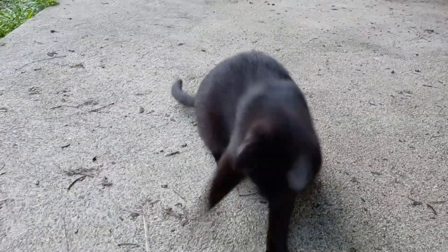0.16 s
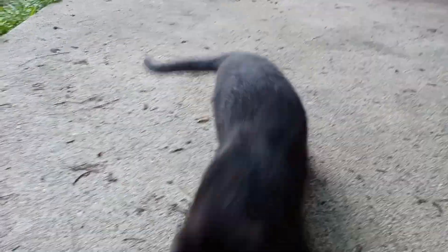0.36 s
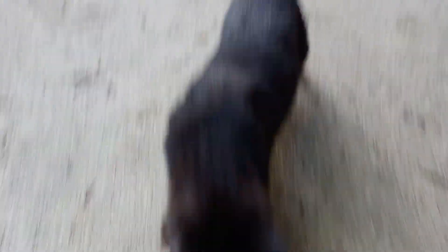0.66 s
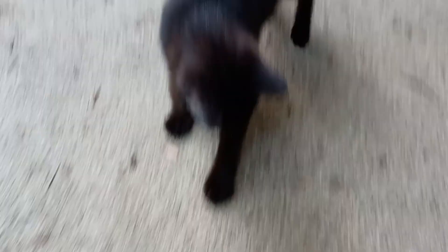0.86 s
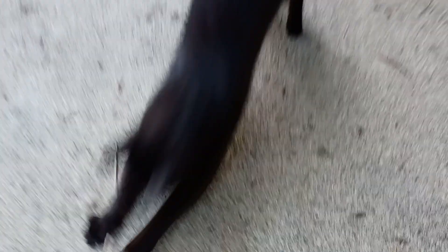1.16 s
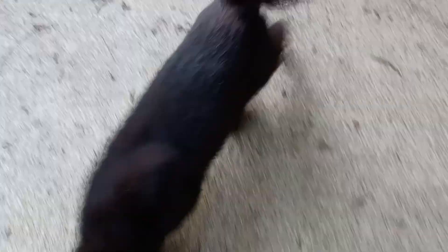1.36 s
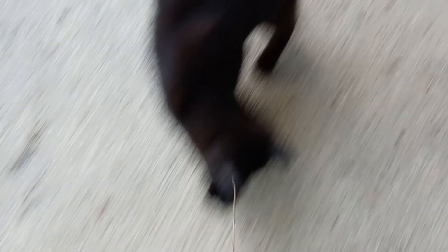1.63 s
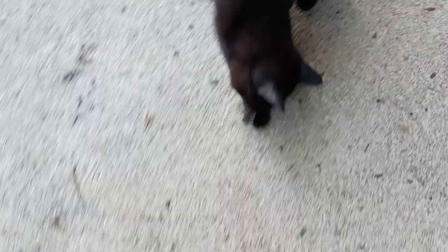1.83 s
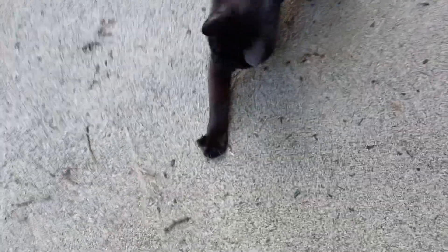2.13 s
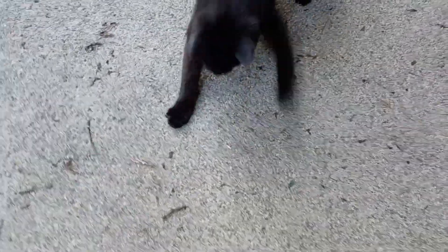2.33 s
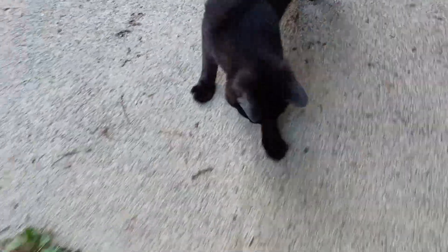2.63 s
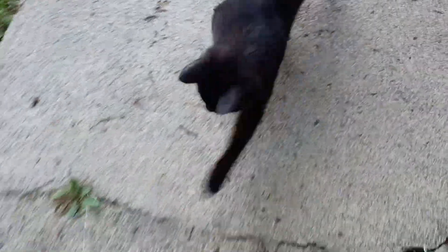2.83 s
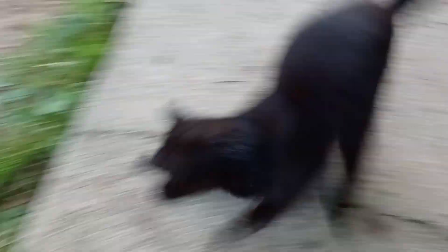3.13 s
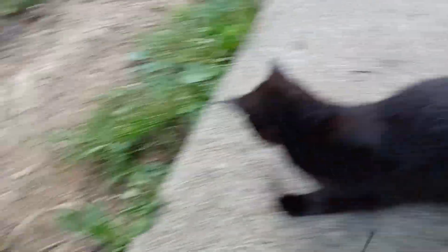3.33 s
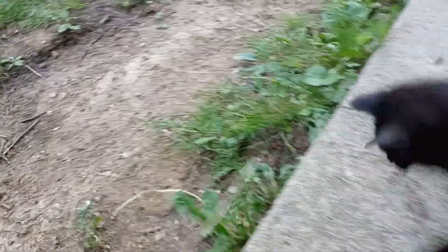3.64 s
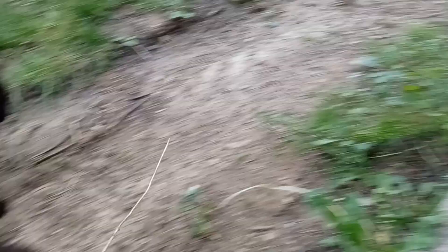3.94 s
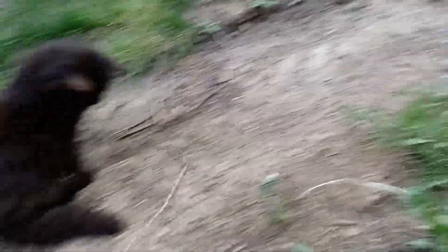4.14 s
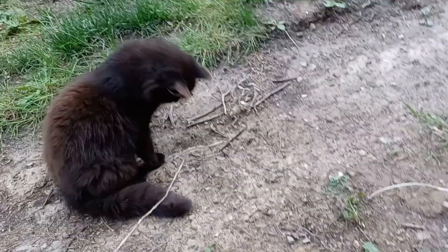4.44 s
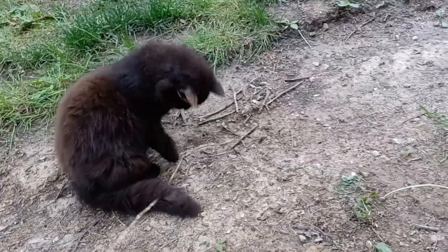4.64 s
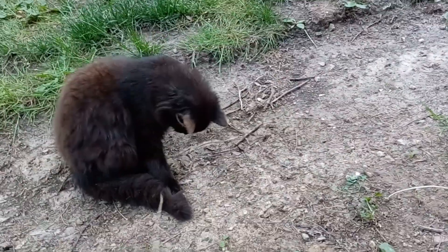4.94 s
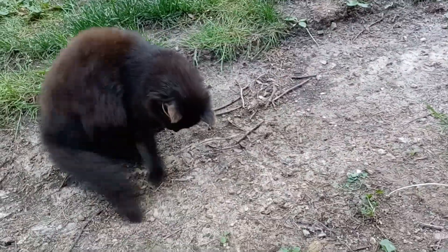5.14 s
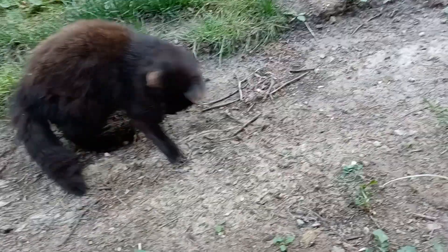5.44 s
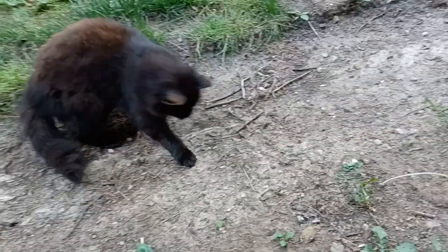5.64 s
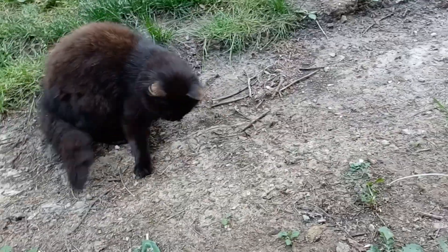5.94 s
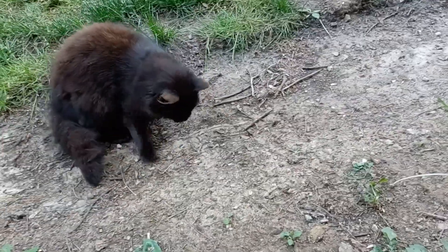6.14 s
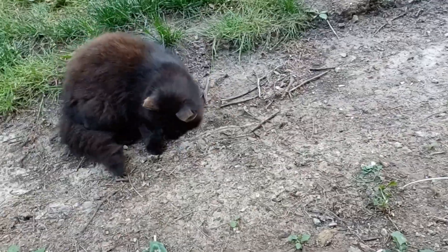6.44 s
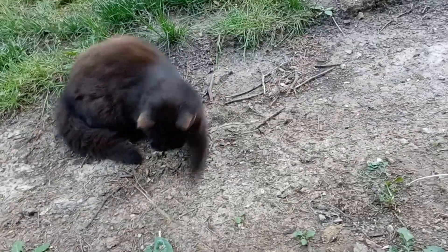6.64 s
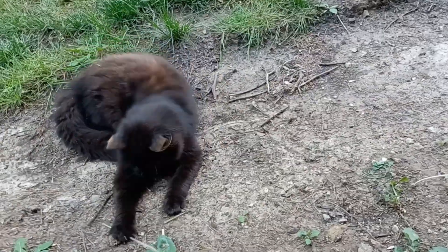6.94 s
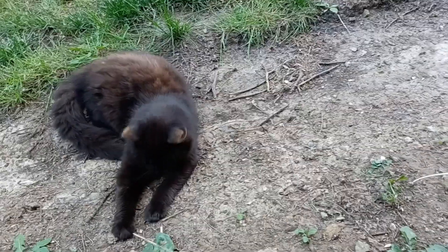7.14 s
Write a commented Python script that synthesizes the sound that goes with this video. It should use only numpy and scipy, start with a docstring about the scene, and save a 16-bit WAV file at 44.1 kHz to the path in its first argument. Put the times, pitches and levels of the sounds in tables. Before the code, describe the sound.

Crisp scratchy twig drags and sharp clicks on rough concrete, dull footsteps, then sparse crackles on bare earth with faint distant birds outdoors.

```python
"""Handheld phone, two ports, a cat chasing a dry twig on the ground just below. From the start the twig drags over
gritty concrete: noise bursts made of grit grains, plus snaps and knocks, ring its stem, middle and tip.
From about 1 s shoes scuff (dull gritty noise) and thud (short low decaying tones). At 4.5 s the twig meets bare
soil, which changes its ring, and far birds rasp as rough gliding tones. Soft rustle, a short echo of the
near sounds, and a far town of coloured noise, hum and rumble lie under it all."""
import sys
import numpy as np
from scipy import signal
from scipy.fft import rfft, irfft
from scipy.io import wavfile
from scipy.ndimage import uniform_filter1d

SR = 44100
rng = np.random.default_rng(int(sys.argv[2]) if len(sys.argv) > 2 else 0)


def log_audio(samples):
    """Write samples as a 16-bit WAV file to the path given in sys.argv[1]."""
    # one column per channel
    frames = np.atleast_2d(samples).T
    # limit to full scale, then quantise
    limited = np.clip(frames, -1, 1)
    pcm = np.round(limited * 32767).astype(np.int16)
    wavfile.write(sys.argv[1], SR, pcm)


N = 321489

WANDER_DB = 2.6  # spread of each mode's level as the point of contact moves
PORT_LAG_S = -0.0001  # left port behind the right; negative: left hears it first

# Resonances of the twig's thick stem, middle and thin tip: [f/Hz, nominal width/Hz, relative level/dB]
STEM_MODES = [(1395, 100, -9), (2219, 320, -1.5), (2397, 100, -2.5), (2715, 50, -0.5), (3386, 676, 1)]
MIDDLE_MODES = [(4045, 280, -0.5), (4223, 160, -0.5), (4700, 100, 3.5), (5437, 500, -2), (6107, 610, 4.5),
                (6770, 850, 3.5), (8200, 1200, -3.5), (10030, 630, -1.5)]
TIP_MODES = [(10970, 1100, 3.9), (12120, 770, 8), (12920, 670, 9.8), (13700, 1900, 3), (14500, 1100, 9.7)]
# Where stem, middle and tip lie before the ports: [left re right level/dB, power share alike at both ports (0-1)]
PART_SIDES = [(-4, 0.57), (-6.5, 0.4), (-2.5, 0.2)]


def twig():
    """Noise whose power follows strokes, snaps and knocks rings the modes of each part of the twig."""
    power = stroke_power() + snap_power()
    power[0] += knock_power()
    out = np.zeros((2, N))
    for part_power, modes, (pan_db, alike) in zip(power, (STEM_MODES, MIDDLE_MODES, TIP_MODES), PART_SIDES):
        push = np.sqrt(part_power) * sides(pan_db)[:, None] * port_noise(alike, PORT_LAG_S)
        out += ring(push, modes)
    return on_soil(out + thick_end())


# Strokes of the twig: [full contact t/s, lift t/s, run-up t/s, middle's level at contact/dB,
# middle's level at lift/dB, tip re middle level/dB, stem re middle level/dB]
STROKES = [(0.093, 0.11, 0.00096, -47.5, -54, 9.5, -5), (0.125, 0.167, .015, -50.5, -44.5, 2, -4.5),
           (0.269, 0.444, 0.074, -47.5, -47, 5.5, -4), (0.66, 0.673, 0.0063, -51, -46.5, -2, -14),
           (0.701, 0.865, 0.012, -56.5, -59, -1.5, -1), (0.887, 1.084, 0.029, -46.5, -39.5, 6.5, -5),
           (1.148, 1.165, 0.016, -55.5, -47, 3.5, -3.5), (1.224, 1.241, 0.0087, -51, -65, 1, -5.5),
           (1.342, 1.406, 0.079, -50.5, -48, 3, -12), (1.602, 1.714, 0.023, -59.5, -58.5, 0.5, -4.5),
           (1.906, 2.022, 0.0045, -42, -65.5, 1.5, -9.5), (2.257, 2.414, 0.13, -46, -46, 7.5, -4.5),
           (2.601, 2.755, 0.1, -47.5, -41, 4, -9), (2.768, 2.874, .02, -49, -40, 0, -10.5),
           (3.04, 3.148, 0.0087, -55, -57.5, -0.5, -12), (3.442, 3.605, 0.14, -45.5, -52, 1, -6.5),
           (4.05, 4.19, 0.025, -76, -71.5, 10, 2), (4.226, 4.395, .01, -65, -67.5, 6, -13),
           (4.766, 4.798, 0.017, -62, -70.5, -15, -5), (5.109, 5.171, 0.013, -70.5, -58.5, 2, 4),
           (5.283, 5.292, 0.055, -59, -68, -9, -18), (5.34, 5.39, .005, -66, -70, -9, -1.5),
           (5.421, 5.443, 0.066, -59.5, -59, -4, -5.5), (5.479, 5.589, 0.021, -53, -50.5, 1.5, -4.5),
           (5.966, 6.037, 0.14, -65.5, -66.5, -2, -2), (6.067, 6.208, .02, -73, -63.5, -16, -12),
           (6.287, 6.341, .005, -65, -67.5, -9, -11), (6.5, 6.507, 0.11, -60.5, -47.5, -5, -2.5),
           (6.607, 6.616, 0.021, -54, -61.5, -4, 0.5), (6.768, 6.801, 0.12, -62.5, -57.5, -6, -3.5),
           (6.912, 7.048, 0.12, -67, -62.5, -7, -9)]
# Smooth sliding under the grains for stem, middle, tip: [power re the grains]
SLIDE_SHARE = [0.35, 0.3, 0.24]
RUN_UP_DB, LIFT_DB_PER_S = 28, 463.5  # rise per run-up time; fall after the lift


def stroke_power():
    """Grains catch and release the dragged twig over smooth sliding: power for stem, middle, tip."""
    part_gain = undb([[2 * stem, 0, 2 * tip] for *_, tip, stem in STROKES])
    drag = part_gain.T @ np.array([stroke(*row[:-2], LIFT_DB_PER_S) for row in STROKES])
    grains = grit(per_s=700, spread_db=-1, ms=1.6, slip_db=2.5)
    return drag * grains ** 2 + np.array(SLIDE_SHARE)[:, None] * drag


# Single snaps, catches and paw taps: [t/s, drive peak level/dB, tip re peak level/dB]
SNAPS = [(0.0968, -34, -0.5), (0.14, -21.5, -1), (0.1587, -30.5, -0.5), (0.2774, -27.5, 6),
         (0.3235, -29, 6.5), (0.4356, -31, -5), (0.6596, -30.5, -1.5), (0.6685, -28, -1.5),
         (0.7103, -36.5, -2.5), (0.817, -30.5, -1), (0.8955, -31, -1.5), (0.9185, -34, 9),
         (1.054, -21, -2.5), (1.074, -37, 9), (1.1545, -33, -3), (1.279, -37, -2), (1.308, -33.5, -1),
         (1.339, -25, -1.5), (1.6025, -30, -1.5), (1.6338, -38, -1.5), (1.9109, -24, -1.5),
         (1.9425, -26, -1.5), (2.0075, -33.5, 0), (2.2196, -33.5, 7), (2.252, -31, 1), (2.396, -28, -2),
         (2.8738, -29, 5.5), (3.023, -44, -2), (3.427, -35, 1), (3.592, -32, -3), (3.627, -39, -5),
         (4.126, -41.5, -1), (4.1598, -47, 7), (4.2423, -38.5, 6.5), (4.2574, -39.5, 3), (4.309, -45.5, 14),
         (4.322, -40, 4), (4.362, -35.5, 2), (4.3762, -39.5, 0.5), (4.5698, -37.5, 2.5),
         (5.1145, -37.5, -9), (5.1438, -31, -1), (5.155, -31.5, -22), (5.17, -42, -21), (5.3386, -35, -15),
         (5.479, -38.5, -3), (5.501, -34, -2.5), (5.5166, -31, -10.5), (5.5394, -30.5, -28),
         (5.5545, -27, -13), (5.559, -24.5, -4.5), (5.5697, -11.5, -10.5), (5.574, -26.5, -9.5),
         (5.5846, -29.5, 0.5), (5.9725, -40, -15), (5.985, -42, -16), (6.0622, -46, -26),
         (6.1576, -30.5, -6), (6.2686, -33.5, -8), (6.277, -36.5, -14), (6.4657, -47.5, -17),
         (6.5025, -39, -18), (6.5164, -32, -18), (6.5517, -43, -2), (6.5829, -28.5, -13),
         (6.625, -46.5, -5), (6.7226, -47.5, -4.5), (6.7787, -33, -11), (6.7883, -31.5, -9),
         (6.8123, -33, -4), (6.997, -42, -10), (7.005, -43, -22)]
SNAP_MS, SNAP_STEM_DB = 2.18, -22.5  # fall time constant; stem's share re the drive


def snap_power():
    """Each catch is a sudden push divided over stem, middle and tip."""
    power = np.zeros((3, N))
    for s, db, tip_db in SNAPS:
        span, push = blow(s, db, SNAP_MS)
        tip = undb(2 * tip_db)
        middle = np.clip(1 - tip, .05, 1)  # what the tip leaves over, at least a little
        power[:, span] += np.outer([undb(2 * SNAP_STEM_DB), middle, tip], push)
    return power


# Woody knocks of the thick stem on the ground: [t/s, drive peak level/dB, fall time constant/ms]
KNOCKS = [(0.1284, -50, 2.5), (1.082, -45, 2.3), (1.599, -43, 3.1), (2.079, -45, 11.4), (2.78, -44, 29),
          (3.256, -42, 3.1), (3.266, -39, 3.6), (3.275, -37, 2.7), (3.4907, -47, 1.6), (3.968, -48, 1.26),
          (5.1733, -39, 1.14), (5.499, -42, 5.2), (5.518, -40, 4.9), (5.584, -32.5, 2.4),
          (5.972, -44.5, 6.4), (6.51, -46, 5.6), ]


def knock_power():
    """Each knock on the ground pushes the stem alone."""
    power = np.zeros(N)
    for s, db, ms in KNOCKS:
        span, push = blow(s, db, ms)
        power[span] += push
    return power


# Resonances of the thick end: [f/Hz, nominal width/Hz, relative level/dB]
THICK_END_MODES = [(1020, 78, 0), (1370, 60, 1.5)]
# When the thick end drags along: [start t/s, end t/s, level/dB]
THICK_END_DRAGS = [(2.29, 2.407, -59), (2.733, 2.816, -65)]


def thick_end():
    """The dragging thick end rings two low modes with smooth noise."""
    power = sum(stroke(a, b, SCUFF_RISE_S, db, db, LIFT_DB_PER_S) for a, b, db in THICK_END_DRAGS)
    return ring(np.sqrt(power) * port_noise(0.54, PORT_LAG_S), THICK_END_MODES)


def on_soil(x):
    """Soft soil, from 4.5 s on, damps the lower middle modes and lets the upper ones ring out."""
    change = 0.61 * band(x, hz=6650, width_hz=1100) - 0.53 * band(x, hz=4200, width_hz=2640)
    return x + change * (np.arange(N) > 4.5 * SR)


# Soft rustle between strokes: [t/s, level/dB, treble re level/dB]
RUSTLE = [(0, -71, 2.5), (0.45, -88.5, -7.5), (0.64, -79.5, -2.5), (1.3, -67.5, -9), (1.5, -69, -4.5),
          (1.88, -72, -7), (2.1, -61, 0), (2.5, -66, -14), (2.98, -66, -2), (3.3, -61, -4.5),
          (3.7, -66.5, -6), (4.2, -72, 2), (4.45, -88, 9.5), (5.05, -88.5, 2), (5.65, -70, 6),
          (5.9, -86, -5.5), (6.2, -69.5, 2.5), (6.43, -78, -3), (6.85, -71.5, 0.5), (7.29, -70.5, 4.5)]
# Broad resonances of the rustle, body then treble: [f/Hz, nominal width/Hz, relative level/dB]
RUSTLE_BODY = [(2640, 1900, -0.5), (4500, 2900, 7.5), (6000, 1500, -5.5)]
RUSTLE_TREBLE = [(12300, 2600, 0)]


def rustle():
    """Broad soft noise of fur, leaves and the idle twig, stronger at the right port."""
    body_db, treble_db = columns(RUSTLE)
    noise = port_noise(0.23, PORT_LAG_S) * undb(body_db) * sides(-7.0)[:, None]
    return ring(noise, RUSTLE_BODY) + ring(noise * undb(treble_db), RUSTLE_TREBLE)


# Shoes scuffing the ground: [start t/s, end t/s, level/dB]
SCUFFS = [(0.946, 1.181, -62), (1.388, 1.41, -53.5), (1.582, 1.602, -55.5), (1.883, 2.003, -56.5),
          (2.277, 2.408, -67), (2.457, 2.515, -60), (2.68, 2.846, -62.5), (3.04, 3.132, -56),
          (3.258, 3.293, -56), (3.483, 3.598, -59.5), (5.52, 5.579, -55), (5.973, 5.997, -63)]
# Smooth shuffle of the soles between scuffs: [t/s, level/dB]
SHUFFLE = [(0.7, -84), (1.2, -73), (3.6, -74.5), (4.15, -69), (4.3, -84), (5.15, -79), (5.3, -75),
           (5.85, -92), (7.29, -90.5)]
# Heel thuds: [t/s, level/dB before the two offsets below, f/Hz]
THUDS = [(1.367, -44.5, 235), (1.597, -58, 215), (1.873, -58, 228), (2.455, -54, 266), (3.277, -42.5, 820),
         ]
SCUFF_RISE_S, SCUFF_FALL_DB_PER_S = 0.068, 244
THUD_BODY_DB, THUD_TONE_DB = -12, 4.5  # noise body and tone, each added to the table's level
THUD_BODY_CYCLES, THUD_TONE_CYCLES = 9.7, 1.6  # fall time constants, in cycles of the tone


def shoes():
    """Dull gritty scuffs and short low thuds, nearly the same at both ports."""
    scuffs = sum(stroke(a, b, SCUFF_RISE_S, db, db, SCUFF_FALL_DB_PER_S) for a, b, db in SCUFFS)
    grains = grit(per_s=600., spread_db=1.6, ms=16.0, slip_db=-4.0)
    power = undb(2 * columns(SHUFFLE)[0]) + grains ** 2 * scuffs
    for s, db, hz in THUDS:
        span, push = blow(s, db + THUD_BODY_DB, THUD_BODY_CYCLES * 1000 / hz)
        power[span] += push
    # (f/Hz, nominal width/Hz, relative level/dB)
    sole_modes = [(216.0, 261, 2.5), (616, 340, -6.5), (1136, 1000, -4.0), (2450, 1300, -11.5)]
    out = ring(port_noise(0.74, 0), sole_modes) * np.sqrt(power)
    t = np.arange(int(.04 * SR)) / SR
    for s, db, hz in THUDS:
        i = int(s * SR)
        tone = np.sin(2 * np.pi * hz * t) * np.exp(-t * hz / THUD_TONE_CYCLES)
        out[:, i:i + len(t)] += undb(db + THUD_TONE_DB) * tone
    return out * sides(1.3)[:, None]


# Far bird rasps and thin squeaks: [start t/s, end t/s, from f/Hz, to f/Hz, roughness width/Hz, level/dB]
RASPS = [(4.55, 4.74, 1800, 2400, 800, -73), (4.61, 4.8, 2600, 2900, 280, -63),
         (4.8, 5.0, 2800, 3000, 400, -69), (4.61, 5.1, 3000, 3250, 200, -60),
         (5.12, 5.3, 3150, 3200, 220, -67), (4.78, 4.92, 3500, 3600, 300, -67),
         (4.93, 5.11, 3650, 3750, 300, -67), (4.745, 5.11, 4500, 4430, 150, -70),
         (6.06, 6.2, 5800, 5750, 400, -64), (6.2, 6.32, 2300, 2150, 300, -69),
         (6.33, 6.49, 2800, 3170, 450, -66), (6.944, 7.25, 3300, 3300, 700, -72),
         (4.57, 4.69, 10500, 10500, 1500, -67), (6.08, 6.2, 4600, 4600, 900, -70)]


def birds():
    """Far birds: rough narrow bands that glide in pitch."""
    return rough_calls(RASPS)


# Soft low hums far off: [start t/s, end t/s, from f/Hz, to f/Hz, roughness width/Hz, level/dB]
LOW_HUMS = [(5.22, 5.32, 420, 420, 200, -73), (5.54, 5.68, 420, 400, 200, -71)]


def low_hums():
    """Soft far hums, made as rough low bands."""
    return rough_calls(LOW_HUMS)


def rough_calls(calls):
    """Each call is a gliding tone whose size and phase wander as fast as its width."""
    glide_s, waver_db, release_s = .045, 3.5, .06  # pitch moves quickly, then levels off
    out = np.zeros((2, N))
    for start, end, from_hz, to_hz, width_hz, db in calls:
        long, first = end - start, int(start * SR)
        t = np.arange(min(int((long + release_s) * SR), N - first)) / SR
        pitch = to_hz + (from_hz - to_hz) * np.exp(-t / glide_s)
        turn = 2 * np.pi * np.cumsum(pitch) / SR
        shape = np.interp(t, [0, .03, long / 2, long, long + release_s], [0, .8, 1, .65, 0])
        shape = shape * undb(db + waver_db * walk(18., size=len(t)))
        for port in out[:, first:first + len(t)]:
            rough = walk(width_hz, size=len(t)) * np.cos(turn)
            rough += walk(width_hz, size=len(t)) * np.sin(turn)
            port += shape * rough
    return out


# Colour of the far town: [f/Hz, relative level per Hz/dB]
TOWN_COLOUR = [(30, -40), (60, -3.5), (110, -1.5), (250, -9), (400, -6.5), (700, -21), (1500, -30),
               (3500, -40), (5000, -23), (6800, -18.5), (8000, -55.5), (16500, -39)]
# Steady hum bands: [f/Hz, width/Hz, level/dB]
HUM = [(119.2, 15, -73), (230.8, 8.3, -80.5)]
# Low rumble: [t/s, level/dB before 1 dB is added]
RUMBLE = [(0.0, -73), (0.43, -69), (0.47, -66.5), (4.77, -81.5), (6.96, -70.5), (7.29, -86)]


def town():
    """Far traffic and leaves as coloured noise with a flickering level, over narrow noise hums and a rumble."""
    hz = np.maximum(np.fft.rfftfreq(N, 1 / SR), 1)
    colour_hz, colour_db = np.transpose(TOWN_COLOUR)
    colour = undb(np.interp(np.log(hz), np.log(colour_hz), colour_db))
    alike = np.clip(.75 - hz / 1200, 0, 1)  # the ports agree only in the bass
    shared, own = rfft(rng.standard_normal(N)), rfft(rng.standard_normal((2, N)))
    spectrum = colour * (np.sqrt(alike) * shared + np.sqrt(1 - alike) * own)
    far = level(irfft(spectrum, N), -75) * undb(3.1 * walk(27.0))
    hum = sum(level(band(port_noise(0.73, 0), hum_hz, width_hz), db) for hum_hz, width_hz, db in HUM)
    rumble = level(band(port_noise(0.33, 0), 110.0, 44.0), 1.0) * undb(columns(RUMBLE)[0])
    return far + hum + rumble


def stroke(contact, lift, run_up, contact_db, lift_db, fall_db_per_s):
    """Power of one stroke: it swells to full contact, drifts while it holds and dies after the lift."""
    start = contact - 3 * run_up
    first, last = max(int(start * SR), 0), min(int((lift + .3) * SR), N)
    db = np.interp(np.arange(first, last) / SR,
                   [start, contact, max(lift, contact + .001), lift + 1],
                   [contact_db - 3 * RUN_UP_DB, contact_db, lift_db, lift_db - fall_db_per_s])
    power = np.zeros(N)
    power[first:last] = undb(2 * db)
    return power


def blow(s, db, ms):
    """Span and power of one blow: a 0.11 ms build-up, then an exponential fall, cut after 27 ms."""
    before, after = 200, 1200  # samples
    t_ms = np.arange(-before, after) / SR * 1000
    shape = np.exp(np.minimum(t_ms / 0.11, -t_ms / max(ms, .3)))
    i = int(s * SR)
    return slice(i - before, i + after), (undb(db) * shape) ** 2


def grit(per_s, spread_db, ms, slip_db):
    """Contact force over rough ground: grains of uneven size, bunched by stick and slip; rms 1."""
    size = undb(spread_db * np.minimum(rng.exponential(size=N), 4))
    grains = (rng.random(N) < per_s / SR) * size
    return level(fade(grains, ms) * undb(slip_db * slips(180.)), 0)


def slips(per_s):
    """The contact bites and lets go: random levels that jump at random moments."""
    jumps = np.cumsum(rng.random(N) < per_s / SR)
    return uniform_filter1d(rng.standard_normal(N)[jumps], size=24)


def fade(x, ms):
    """Every impulse becomes a sudden rise and an exponential fall."""
    return signal.lfilter([1], [1, -np.exp(-1000 / (ms * SR))], x)


def ring(x, modes):
    """Each mode takes a wandering share; white noise of rms 1 leaves with rms near 1."""
    def twice(v, hz, width_hz):
        # two passes narrow the band, so each is wider than nominal
        return band(band(v, hz, 1.92 * width_hz), hz, 1.92 * width_hz)

    impulse = np.eye(1, 4096)[0]
    response = sum(undb(db) * twice(impulse, hz, w) for hz, w, db in modes)
    out = sum(undb(db + WANDER_DB * walk(12.)) * twice(x, hz, w) for hz, w, db in modes)
    return out / np.sqrt(np.sum(response ** 2))


def band(x, hz, width_hz):
    """One resonance, gain 1 at its centre."""
    return signal.lfilter(*signal.iirpeak(min(hz, .45 * SR), hz / width_hz, fs=SR), x)


def walk(rate, size=N):
    """Random levels 1 / rate s apart, joined by straight lines; spread near 1."""
    knots = rng.standard_normal(int(size / SR * rate) + 2)
    return np.sqrt(3 / 2) * np.interp(np.arange(size) * rate / SR, np.arange(len(knots)), knots)


def port_noise(alike, lag_s):
    """Noise as two microphone ports hear it: partly shared, the left shifted by the lag."""
    shared, own = rng.standard_normal(N), rng.standard_normal((2, N))
    both = np.array([np.roll(shared, int(lag_s * SR)), shared])
    return np.sqrt(alike) * both + np.sqrt(1 - alike) * own


def sides(pan_db):
    """Left and right gains for a left-minus-right difference."""
    return undb(np.array([pan_db, -pan_db]) / 2)


def columns(table):
    """Each column of a curve table at every sample."""
    s, *rest = np.transpose(table)
    return [np.interp(np.arange(N) / SR, s, c) for c in rest]


def level(x, db):
    """Scale to an rms level."""
    return x * undb(db) / np.sqrt(np.mean(x ** 2))


def undb(db):
    """Decibels to gain; doubled decibels give power."""
    return 10 ** (np.asarray(db) / 20)


def echo(near):
    """Ground and nearby walls send back a short scattered tail: decaying noise, 60 dB down in 0.072 s."""
    t = np.arange(int(.3 * SR)) / SR
    tail = rng.standard_normal((2, len(t))) * 10 ** (-3 * t / 0.072)
    tail *= undb(-19) / np.sqrt(np.sum(tail[0] ** 2))
    return signal.fftconvolve(near, tail, axes=1)[:, :N]


def scene():
    """Near ground sounds with their echo, over the far birds, hums and town."""
    near = twig() + rustle() + shoes()
    return near + echo(near) + birds() + low_hums() + town()


def record(dry):
    """High-pass at 55 Hz, a 30 dB step down above 15.85 kHz, a steep low-pass at 16.95 kHz."""
    dry = signal.sosfilt(signal.butter(3, 55., "high", fs=SR, output="sos"), dry)
    dry = signal.sosfilt(signal.ellip(6, .5, 30, 15850, fs=SR, output="sos"), dry)
    return signal.sosfilt(signal.ellip(10, .2, 80, 16950, fs=SR, output="sos"), dry)


dry = scene()
out = record(dry)
log_audio(out)
```